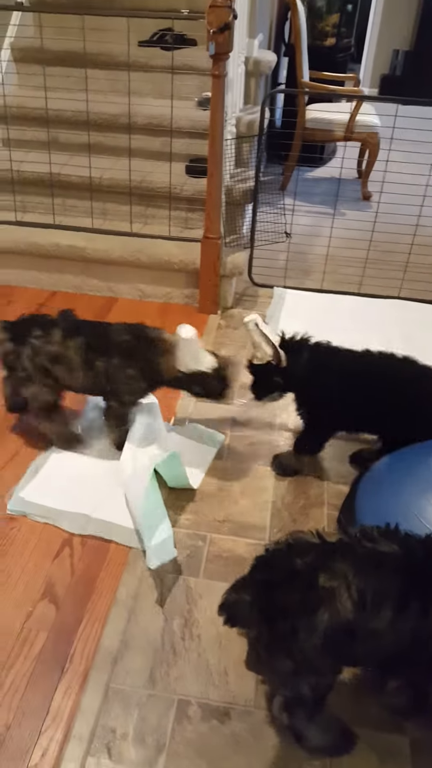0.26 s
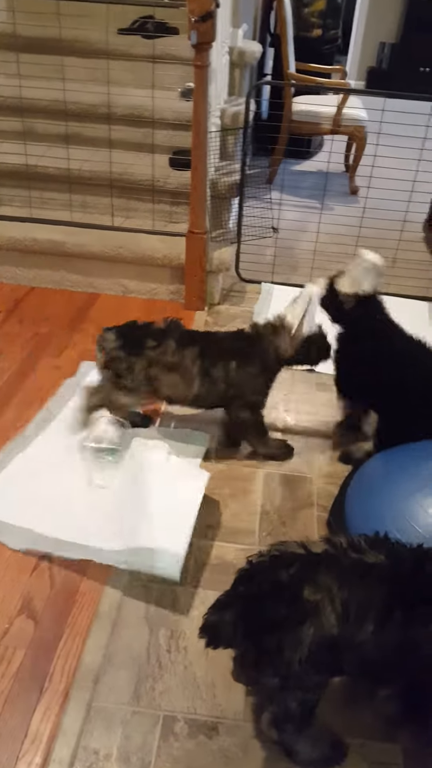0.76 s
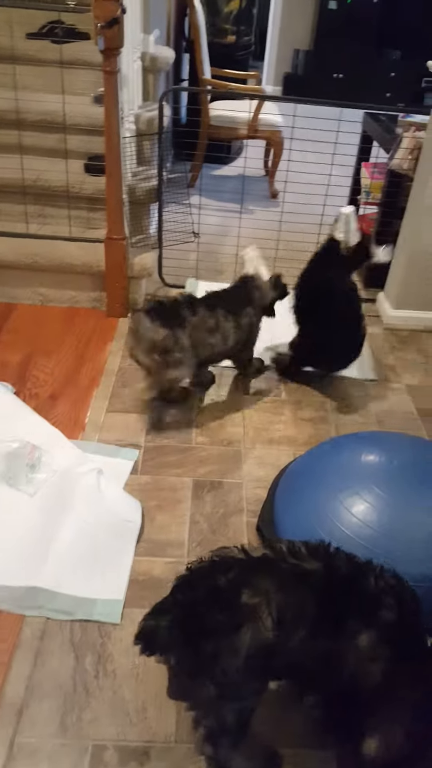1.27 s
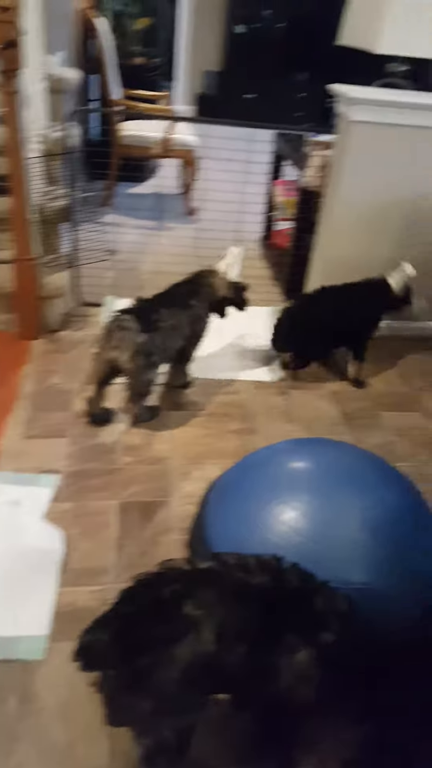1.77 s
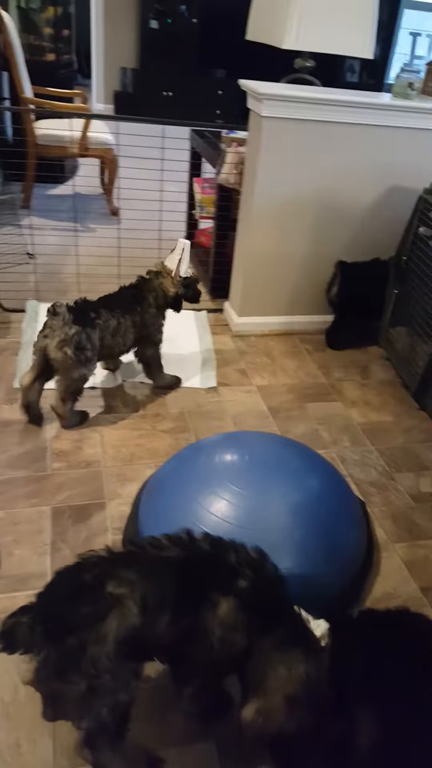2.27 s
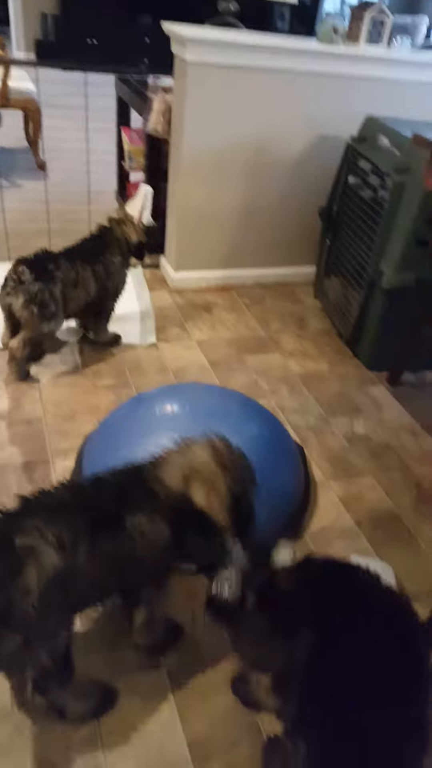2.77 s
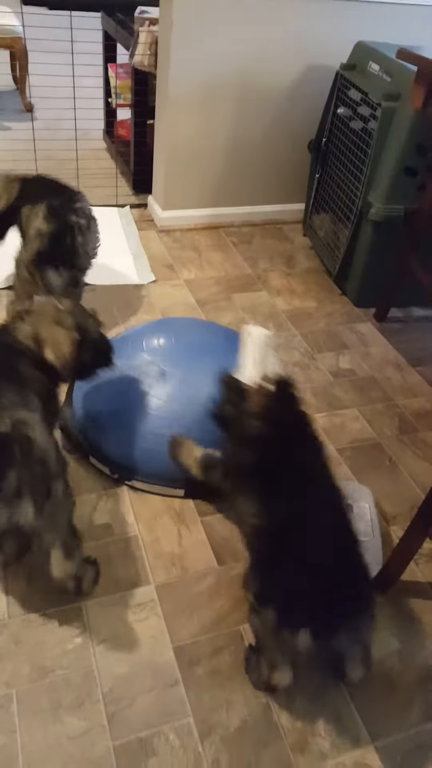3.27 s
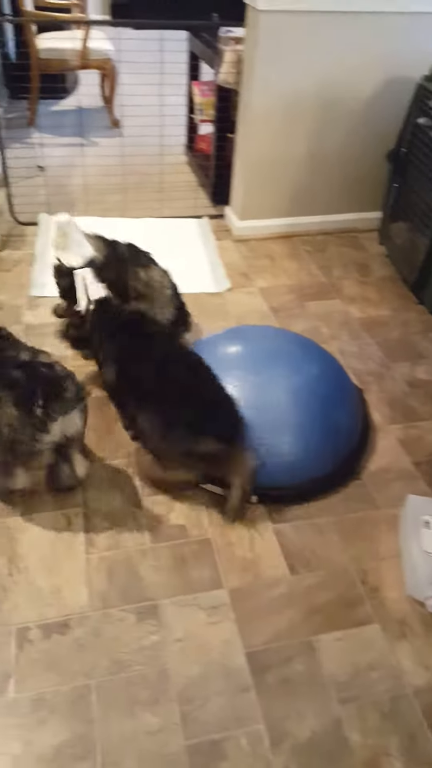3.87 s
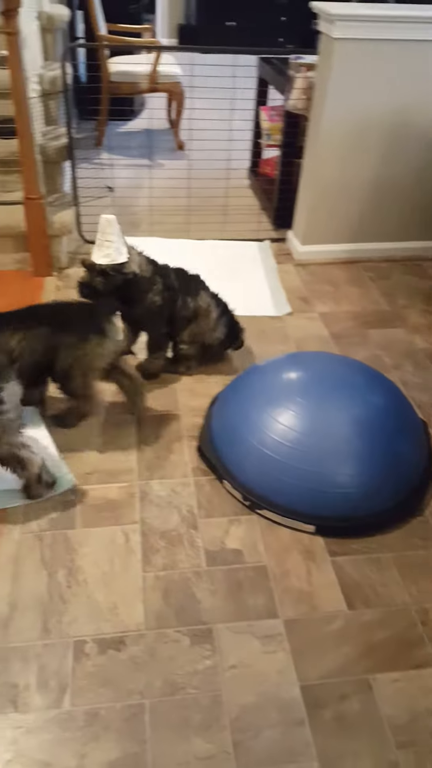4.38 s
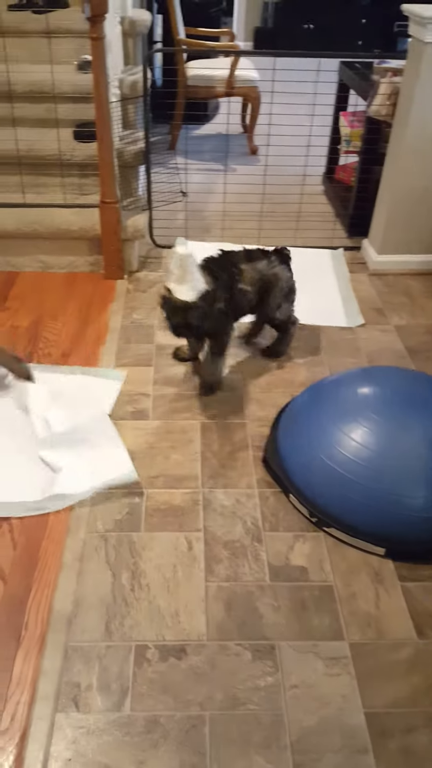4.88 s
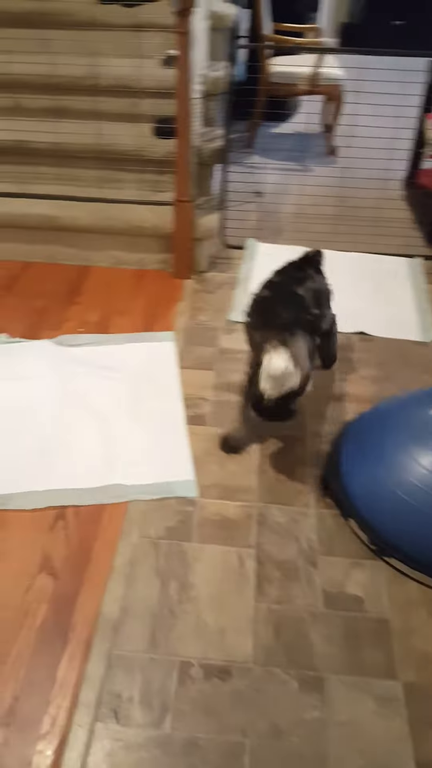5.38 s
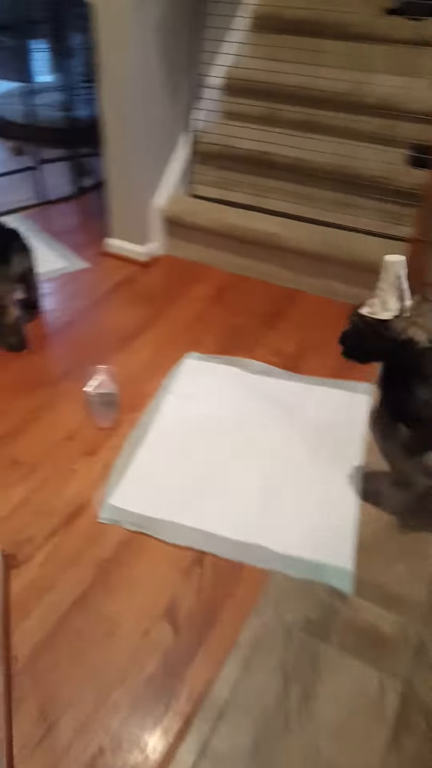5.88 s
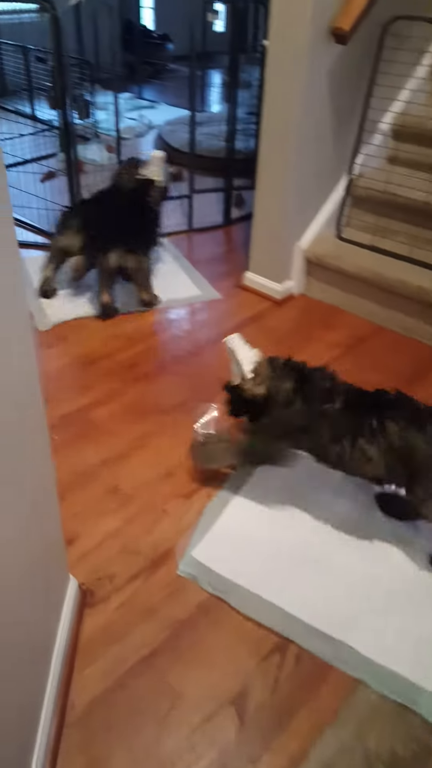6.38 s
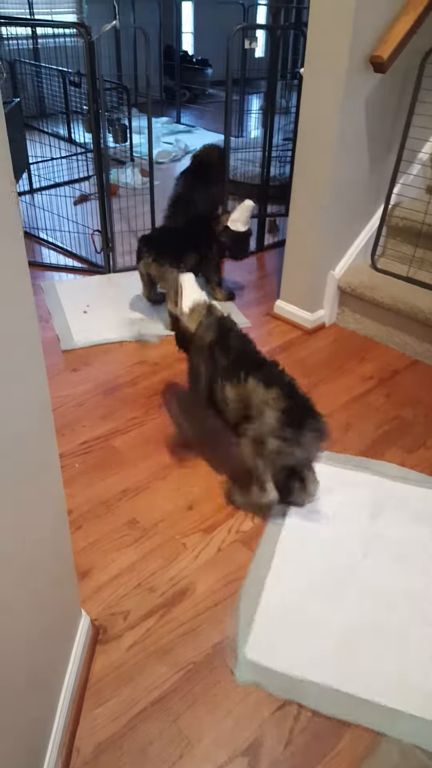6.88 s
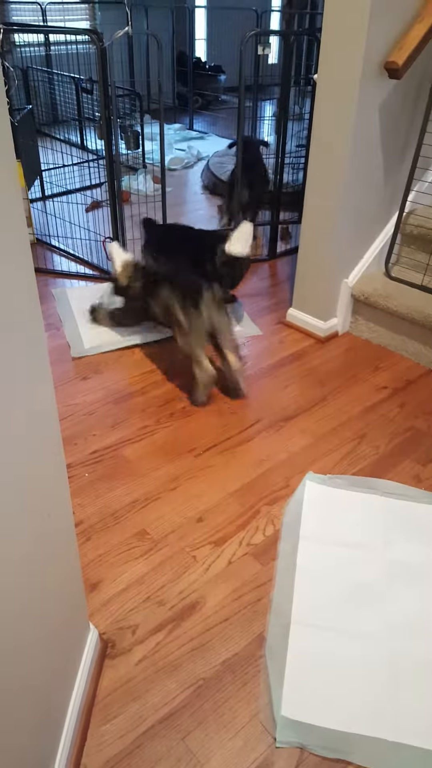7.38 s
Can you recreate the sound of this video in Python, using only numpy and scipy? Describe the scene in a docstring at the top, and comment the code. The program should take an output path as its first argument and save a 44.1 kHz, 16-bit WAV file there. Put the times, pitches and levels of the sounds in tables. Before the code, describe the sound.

An empty plastic bottle bounces hollowly across a hard floor while puppies' paws thump, claws click and paper pads swish.

```python
"""A kitchen with a wood and vinyl floor, where puppies romp with an empty plastic bottle.
The bottle bounces with hollow knocks and pings, claws and buckling plastic click, and paws thud
on the boards. Feet scuff and scrabble over floor and paper pads in bouts.
A fairly live room answers every blow, over a quiet room tone."""
import sys
import numpy as np
from scipy import signal
from scipy.fft import rfft, irfft, next_fast_len
from scipy.io import wavfile
from scipy.ndimage import uniform_filter1d

SR = 44100
rng = np.random.default_rng(int(sys.argv[2]) if len(sys.argv) > 2 else 0)


def dump_mix(stems):
    """Bounce the given channels to the path in sys.argv[1] as a 16-bit WAV at rate SR."""
    frames = np.atleast_2d(stems).T  # one column per channel
    limited = np.clip(frames, -1, 1)  # hard clip at full scale
    pcm = np.round(limited * 32767).astype(np.int16)
    wavfile.write(sys.argv[1], SR, pcm)


N = 336924
HIT_TIME = np.arange(SR // 10) / SR   # time inside one hit [s]

# bottle bounces: (time [s], level [dB], pitch [Hz], wall [dB], tick offset [dB], reverb send [dB])
KNOCK_HITS = [(0.133, -35.5, 440, -28.5, -13, 0.5), (0.214, -13, 950, -10.5, -18, -9),
              (0.237, -10.5, 654, -10.5, -17, -0.5), (0.321, -8.5, 563, -12.5, -21, 2),
              (0.515, -19.5, 510, -19.5, -16, 1.5), (0.823, -22, 520, -30, -13, 1),
              (0.93, -26.5, 444, -46, -13, 5.5), (0.966, -17.5, 428, -54, -7, 1),
              (1.254, -6.5, 598, -50, -13, -0.5), (1.278, -22, 617, -49, -13, 1),
              (1.31, -26, 643, -43, -13, 2), (1.371, -28, 614, -23.5, -11, -3.5),
              (1.794, -52, 940, -27.5, -13, 9.5), (1.808, -29.5, 560, -29, -5.5, 7.5),
              (2.094, -23, 587, -32.5, -10, -8), (2.676, -19, 850, -42, -13, -0.5),
              (2.7, -23.5, 540, -29, -10, 0), (2.985, -28, 720, -18, -31, -10),
              (4.581, -13.5, 520, -18, -31, 1.5), (4.726, -12.5, 620, -22.5, -15, -2),
              (4.778, -25, 467, -29.5, -7, 0), (4.924, -22, 656, -44, -13, 1),
              (4.951, -23.5, 520, -24.5, -11, 6.5), (5.064, -23, 680, -75, -9, 7),
              (5.2, -23, 610, -35, -15, 8.5), (5.3, -13, 635, -22, -6, -3),
              (5.329, -15.5, 647, -36, -8.5, -1.5), (5.403, -16.5, 583, -36, -13, -12),
              (5.445, -17.5, 615, -50, -13, 3), (5.646, -27, 630, -33, -7, 1),
              (5.703, -31.5, 550, -28, -16, 6), (6.455, -23, 500, -25, -26, 9),
              (6.462, -14.5, 560, -21, -2.5, 2.5), (6.488, -27, 720, -43, -14, -9),
              (6.504, -4.5, 623, -12.5, -12, -1), (6.718, -16.5, 664, -18.5, -9, 4.5),
              (6.735, -13.5, 630, -16, -15, -9), (6.853, -18, 690, -24.5, -9, 1),
              (7.325, -30, 644, -53, 7.5, 8.5), (7.4225, -22, 750, -26, -18, 9.5),
              (7.435, -11, 493, -20, -11.5, 3.5), (7.466, -16.5, 554, -16.5, -24, 1),
              (7.566, -21, 480, -39, -11, 4.5), (7.594, -9.5, 696, -25, -0.5, 1.5)]
# ringing notes of the bottle, and one short squeak of a skidding paw at 2.28 s: (time [s], level [dB], pitch
# [Hz], t60 [s])
PING_HITS = [(0.2374, -18, 1270, 0.033), (0.322, -18.5, 519, 0.13), (0.323, -9.5, 889, 0.045),
             (0.515, -21, 512, 0.072), (0.964, -17.5, 248, 0.085), (0.966, -22.5, 466, 0.15),
             (1.255, -14, 637, 0.13), (2.2832, -11.5, 4180, 0.02), (2.595, -32, 1220, .03),
             (2.677, -36, 980, .04), (2.7434, -28, 2050, .015), (2.7737, -20, 3150, 0.013),
             (2.9325, -25, 1190, 0.037), (2.9327, -19.5, 3750, 0.014), (2.933, -21, 1930, .025),
             (2.985, -33, 1030, 0.034), (2.9852, -28, 2010, .025), (3.168, -20, 1240, 0.016),
             (3.45, -17.5, 1280, .025), (3.4719, -13.5, 1246, 0.023), (3.5189, -16, 1310, 0.036),
             (3.5191, -13.5, 3680, 0.016), (4.58, -13.5, 259, 0.06), (4.581, -14, 560, 0.056),
             (4.5815, -21, 1400, 0.075), (4.727, -22, 830, 0.043), (4.9406, -15, 1130, 0.033),
             (5.1991, -9, 1265, 0.011), (5.2995, -19, 1020, 0.02), (5.301, -22, 609, 0.11),
             (5.33, -31, 910, .05), (5.405, -23.5, 870, 0.057), (5.446, -19.5, 742, 0.044),
             (5.4876, -19.5, 3200, 0.011), (6.505, -10, 866, 0.055), (6.511, -16.5, 526, .12),
             (6.6433, -14.5, 1370, 0.022), (6.644, -15.5, 944, 0.022), (6.719, -21, 636, 0.19),
             (6.736, -33, 785, 0.23), (6.854, -30, 780, 0.17), (7.445, -24, 620, 0.18),
             (7.468, -30, 600, 0.091), (7.466, -23.5, 1270, 0.17), (7.594, -11.5, 635, 0.11)]
# claws and buckling plastic: (time [s], level [dB], ring [Hz], body [dB], edge [dB], reverb send [dB])
CLICK_HITS = [(0.2432, -20, 2550, -17, -18.5, 6.5), (0.3198, -23, 3000, -34, -33, -5),
              (0.4716, -40, 2800, -21, -36, 7), (0.512, -16, 3600, -28, -48, -17),
              (0.828, -37, 4760, -38, -44, 18), (0.9242, -25, 3300, -53, -21.5, 4),
              (0.963, -46, 4500, -46, -31.5, 16), (1.113, -36, 4300, -33.5, -42, 9.5),
              (1.1697, -33, 3870, -42, -36.5, 12.5), (1.302, -29, 3900, -54, -27, 2),
              (1.466, -30, 4750, -26, -17, -1), (1.4764, -33, 3530, -25, -51, 9.5),
              (1.51, -27, 4710, -24, -58, 7), (1.533, -41, 4300, -37, -50, -9),
              (1.579, -27, 4600, -44, -48, -4), (1.6002, -27, 3500, -38, -15.5, 4.5),
              (1.6065, -36, 4500, -38, -21, 1), (1.671, -27, 3900, -48, -83, 9),
              (1.8242, -25, 3100, -26.5, -22.5, 6), (1.9624, -17.5, 4800, -22, -22, 2.5),
              (1.9005, -23, 4700, -31, -59, -17), (2.2486, -20.5, 4330, -47, -58, -7),
              (2.2835, -10.5, 4160, -26, -41, 5), (2.4296, -23, 2600, -24.5, -15.5, 5),
              (2.4675, -26, 2800, -22, -29, -6), (2.5686, -27.5, 4540, -31, -60, 7.5),
              (2.597, -19.5, 3950, -22.5, -46, 5), (2.6352, -22, 4930, -25, -23, -2),
              (2.6685, -17.5, 4600, -18, -14.5, 4), (2.6775, -27, 4200, -20, -30, 5),
              (2.7025, -31, 4000, -25, -33, 12), (2.7432, -12.5, 2700, -15.5, -10, 1.5),
              (2.7732, -22, 3150, -18.5, -4, 1.5), (2.7815, -27, 4070, -28.5, -19, 15.5),
              (2.9323, -16, 2740, -23, -35, 4.5), (2.943, -21, 3300, -17, -11, 0.5),
              (2.9846, -11.5, 2660, -15, -30, 4.5), (2.9945, -25, 2600, -16, -30, -3),
              (3.0385, -20, 3100, -27, -48, -3), (3.078, -26, 3200, -34, -35, 2),
              (3.108, -25, 2800, -26, -47, -2), (3.1677, -28.5, 2550, -31, -43, 9),
              (3.427, -28, 4200, -43, -33, 6), (3.4493, -17, 3270, -27, -45, 4.5),
              (3.4717, -18, 3240, -16, -14.5, 5), (3.482, -29, 3400, -27, -20, -6),
              (3.5189, -14, 3800, -15, -19, 2), (3.829, -37, 2720, -31, -46, 10.5),
              (3.9161, -25, 3600, -24.5, -42, 9.5), (3.947, -32, 3800, -42, -32, 9),
              (3.982, -17, 2660, -21.5, -22.5, 6.5), (3.9915, -29, 2800, -41, -33, -1),
              (4.1886, -30, 3500, -50, -36.5, 7.5), (4.9084, -28, 3500, -21.5, -28, 5.5),
              (4.9403, -32, 3300, -18.5, -27, 10), (4.9595, -40, 3000, -48, -35, 9),
              (5.2003, -13.5, 3300, -17, -17, 5), (5.2072, -20, 2850, -23, -42, -8),
              (5.3704, -17.5, 3500, -23, -24, -4), (5.4131, -18.5, 3400, -23, -26, 4),
              (5.454, -16.5, 2940, -29, -45, 2), (5.4875, -22, 3430, -19, -40, -10),
              (5.509, -30, 2800, -26, -52, 2), (5.527, -37, 2900, -27.5, -52, -6),
              (5.7595, -41, 2600, -30, -58, 0), (5.778, -37, 2600, -42, -45, 6),
              (6.1387, -44, 3800, -39.5, -46.5, 15), (6.4605, -29, 3800, -19, -24, 13),
              (6.5039, -14.5, 4330, -33, -28, -1), (6.512, -36, 4200, -28, -25, 1),
              (6.5185, -26, 4400, -27, -30, 4), (6.6433, -18.5, 2590, -14, -19, 4),
              (6.7448, -18.5, 2880, -21, -21, 4)]
# resonances of the bottle's thin wall: (frequency [Hz], width [Hz], boost [dB])
WALL_MODES = [(1270, 490, -2.5), (1820, 1540, -11), (2110, 660, 9.5), (3500, 880, 4), (8130, 2700, 9),
              (13500, 1300, 4)]
# the clicks move with the puppies: (time [s], left channel lag [ms])
CLICK_LAG = [(0.0, 0.063), (1.25, -0.1), (1.45, 0.22), (2.42, 0.24), (2.78, 0.17), (2.95, 0.08),
             (3.5, 0.02), (5.4, 0.043), (6.55, -0.053), (7.6, -0.11)]
# paw landings: (time [s], level [dB], floor pitch [Hz], slap offset [dB])
PAW_HITS = [(0.135, -35, 75, -18), (0.236, -27, 206, -20), (0.325, -19, 222, -20), (0.47, -16, 180, -23),
            (0.62, -27, 170, -17), (0.69, -28.5, 148, -17), (0.755, -42, 160, -20), (0.82, -23, 198, -19),
            (0.964, -15.5, 248, 0), (1.066, -18, 139, -15), (1.31, -25, 157, -28), (1.385, -53, 150, -20),
            (1.533, -16.5, 134, -11), (1.552, -18.5, 179, -19), (1.573, -20, 109, -4),
            (1.847, -15.5, 154, -8), (1.965, -29.5, 171, -7), (2.068, -20.5, 124, -7.5),
            (2.246, -19, 184, -12), (2.295, -20.5, 158, -18), (2.43, -41, 141, -19), (2.5, -41, 150, -22),
            (2.645, -24, 139, -3.5), (2.858, -34.5, 203, -24), (2.985, -23.5, 206, -2),
            (3.032, -23, 146, -9), (3.072, -27.5, 173, -23), (3.105, -25.5, 124, -11),
            (3.18, -35, 121, -18), (3.238, -23, 133, -14), (3.345, -30.5, 129, -26),
            (3.39, -26.5, 131, -24), (3.42, -22, 167, -12), (3.485, -32, 173, -24), (3.555, -26, 145, -19),
            (3.582, -20.5, 121, -21), (3.694, -25, 190, -19), (3.722, -25, 142, -26),
            (3.797, -32, 138, -28), (3.832, -16.5, 112, -19), (3.9, -24, 121, -21),
            (3.917, -16.5, 171, -5.5), (3.935, -18.5, 167, -28), (3.952, -15, 135, -23),
            (4.02, -27.5, 220, -22), (4.05, -21, 118, -32), (4.2, -31, 160, -26), (4.3, -31, 108, -30),
            (4.425, -31, 111, -11), (4.579, -15.5, 282, -8), (4.655, -24, 252, -15), (4.724, -23, 273, -28),
            (4.775, -26, 274, -20), (4.83, -27, 237, -3), (4.91, -38, 150, -23), (4.945, -30, 150, -15),
            (5.02, -20, 103, -16), (5.06, -19.5, 233, -5), (5.14, -26.5, 109, -22), (5.22, -29, 119, -27),
            (5.39, -28, 202, -13), (5.467, -15, 146, -22), (5.495, -22, 187, -16), (5.675, -42, 130, -22),
            (5.759, -27.5, 150, -12), (6.083, -23, 156, -24), (6.181, -24.5, 104, -12),
            (6.25, -23.5, 238, -11), (6.3, -33, 122, -24), (6.49, -18.5, 109, -25), (6.56, -26, 115, -22),
            (6.645, -27, 113, -12), (6.723, -22.5, 172, -27), (6.835, -17.5, 223, -12),
            (6.92, -18, 122, -12), (7.044, -9, 154, -21), (7.125, -27, 121, -21), (7.17, -24.5, 128, -22),
            (7.219, -21, 186, -4.5), (7.275, -23.5, 173, -23), (7.432, -8, 300, -17),
            (7.479, -17, 140, -12), (7.599, -12, 139, -13)]
# how far the joists give where the puppies are: (time [s], level against the boards [dB])
JOIST_GIVE = [(0.0, -29), (1.5, -11.5), (2.7, -25), (4.0, -10), (4.9, -47), (7.64, -34)]
# feet sliding on floor and pads: (time [s], level [dB], pitch [Hz], width [octaves])
FOOT_SLIDES = [(0.004, -26, 1890, 0.85), (0.13, -25, 2110, 0.64), (0.2135, -10, 2200, 0.89),
               (0.5667, -11.5, 1820, 1), (0.63, -19, 1270, 1.9), (1.21, -28, 1230, 0.47),
               (1.384, -22, 1220, 2), (1.55, -32, 1490, 2.7), (2.153, -22.5, 3840, 1.1),
               (2.2, -20.5, 1720, 1.9), (3.009, -20, 1380, 1.8), (3.12, -14, 1010, 1),
               (3.201, -24, 1900, 1.5), (3.31, -18, 1100, 1.74), (4.093, -20.5, 2450, 1.6),
               (4.385, -28, 1380, 0.57), (4.459, -22.5, 1310, 2.1), (4.461, -27.5, 5170, 0.6),
               (4.843, -14.5, 3630, 1.26), (5.589, -18.5, 1600, 3.9), (5.757, -31, 1470, 2.6),
               (6.315, -27.5, 1600, 1.2), (7.464, -12, 1510, 1.55), (7.562, -13, 1820, 1.9)]
# a paper pad is dragged or trodden on: (time [s], swish [dB], fine hiss [dB])
PAD_DRAGS = [(0.13, -49, -52.5), (0.41, -44, -50), (0.57, -35, -44), (1.09, -48, -53), (1.27, -60, -53),
             (1.56, -62, -58), (2.3, -40.5, -50), (3.075, -35.5, -48), (3.5, -37, -58), (4.09, -45.5, -53),
             (4.39, -49.5, -51), (4.46, -63, -68), (4.61, -60, -56), (4.75, -42.5, -51), (5.15, -44, -52),
             (5.985, -59, -58.5), (6.17, -54, -55.5), (6.235, -47, -57), (6.29, -46, -51.5),
             (6.75, -50, -48), (6.931, -47, -44), (7.02, -47, -52), (7.3, -59, -56), (7.545, -48, -62)]
# fader ride of the soft steps, in bouts: (time [s], level [dB])
STEP_FADER = [(0.0, -41), (0.2, -63), (0.32, -38.5), (0.78, -47.5), (1.3, -45), (1.75, -54), (2.05, -43),
              (2.9, -49.5), (3.05, -43), (3.95, -51), (4.53, -48.5), (4.66, -39), (5.55, -41),
              (5.95, -58.5), (6.22, -39), (6.42, -57), (6.62, -38), (7.39, -36), (7.64, -41)]
# fader rides between the hits: (time [s], scrabbling [dB], paper rustle [dB])
BUSTLE_FADERS = [(0.0, -30, -39), (0.12, -52, -56), (0.38, -34, -42), (0.62, -31, -72), (0.78, -42, -41.5),
                 (1.2, -39, -48.5), (1.62, -40, -39.5), (1.92, -40, -50), (2.2, -41, -40.5),
                 (2.4, -42.5, -45), (2.53, -46, -50), (2.8, -38.5, -46), (3.3, -44.5, -45.5),
                 (3.5, -32.5, -54), (3.6, -46.5, -46), (3.78, -51, -47.5), (4.0, -37.5, -72),
                 (4.29, -53.5, -55.5), (4.55, -35, -46.5), (4.9, -39, -45), (5.1, -59, -48.5),
                 (5.45, -35, -44.5), (5.92, -50, -75), (6.42, -55, -58), (6.75, -33, -44), (7.05, -39, -44),
                 (7.39, -42.5, -52.5), (7.5, -36.5, -50), (7.64, -21, -34)]
# tone of the soft steps: (frequency [Hz], level [dB])
STEP_EQ = [(30, -47), (60, -13), (95, 5.5), (150, -6), (260, -3), (400, -12.5), (800, -69)]
# tone of scrabbling claws: (frequency [Hz], level [dB])
SCRABBLE_EQ = [(250, -6.5), (450, 2.5), (700, 3.5), (1200, -4.5), (2000, -14.5), (3600, -13.5),
               (6000, -18.5), (10000, -27)]
# tone of crumpling paper: (frequency [Hz], level [dB])
RUSTLE_EQ = [(2500, -1.5), (4500, -6), (6300, -8.5), (8200, -11.5), (10500, -16), (14500, -12),
             (17000, -64)]
# tone of sliding paper: (frequency [Hz], level [dB])
SWISH_EQ = [(2500, 3.5), (4500, 0), (6300, -4.5), (8200, -12), (10500, -24), (14800, -38), (17000, -45)]
# fine hiss on top of a sliding pad: (frequency [Hz], level [dB])
HISS_EQ = [(4000, -16), (8300, 3), (10500, -3), (14500, -5), (17000, -30)]
# the kitchen's steady background: (frequency [Hz], level [dB])
ROOM_TONE_EQ = [(25, -19), (60, 11.5), (140, 31), (300, -6), (650, 8.5), (1200, 5), (2500, 0), (5500, -6),
                (10000, -13.5), (16000, -16)]
# reverb decay by band: (frequency [Hz], t60 [s])
REVERB_DECAY = [(90, 0.46), (260, 0.42), (700, 0.55), (2000, 0.65), (5000, 0.31), (9000, 0.29),
                (15000, 0.024)]
# floor and room resonances and the dips between them: (frequency [Hz], width [Hz], boost [dB])
REVERB_MODES = [(146, 12, 4), (244, 69, 8), (414, 31, -3.5), (507, 100, 4), (635, 81, 3), (820, 61, 3),
                (1600, 300, -1.5)]
# stereo lean by pitch: (frequency [Hz], left minus right [dB])
STEREO_LEAN = [(100, 1.3), (250, 1.8), (500, 3), (1000, 1.5), (2000, 0.5), (4000, -2), (8000, -0.5),
               (13000, 4)]


def bottle_knocks(spots, hollow_db=-1.0, wall_db=-5.0):
    """The bottle bounces: its air and shell ring hollow, the floor booms, its thin wall ticks."""
    out = np.zeros((2, N))
    for k, (s, db, hz, wall, tick, send_db) in enumerate(KNOCK_HITS):
        touch = resonate(contact(smear_s=0.002105), WALL_MODES)
        boom_db = -15.5 - 21 * np.log2(hz / 560)   # lower knocks shake the floor more
        shell = at_level(band(touch, hz=1050, octaves=0.84), wall + wall_db)
        top = at_level(band(touch, hz=3600, octaves=0.81), wall + tick)
        hollow = at_peak(band(HIT_TIME == 0, hz, octaves=0.83, order=3), db + hollow_db)
        boom = at_level(band(HIT_TIME == 0, hz=257.6, octaves=0.99, order=3), db + boom_db)
        add(out, s, in_room(shell + top + hollow + boom, spots[k % len(spots)], send_db, pan_db=-1.0))
    return out


def bottle_pings(spots, trim_db=-2.0, rise_cycles=1.26):
    """A knock or a popping dent rings one note of the bottle; where it is struck decides which. A skidding paw
    squeaks once in the same way."""
    out, t = np.zeros((2, N)), np.arange(SR // 4) / SR
    for k, (s, db, hz, t60) in enumerate(PING_HITS):
        attack = 1 - np.exp(-hz * t / rise_cycles)
        ring = np.sin(2 * np.pi * hz * t) * attack * np.exp(-np.log(1000) * t / t60)
        add(out, s, in_room(at_peak(ring, db + trim_db), spots[k % len(spots)], wet_db=-9.5))
    return out


def clicks(spots, body_db=-5.5, edge_db=-10.0, wet_db=-5.5):
    """A claw tip or a buckling wall snaps: a broad crack, a lower body note and a bright edge."""
    out = np.zeros((2, N))
    for k, (s, db, hz, body, edge, send_db) in enumerate(CLICK_HITS):
        snap = resonate(contact(smear_s=0.0024), WALL_MODES)
        octaves = 0.96 * (3300 / hz) ** 1.57   # higher clicks ring narrower
        click = at_peak(band(snap, hz, octaves), db)
        # neighbouring modes swing in opposition
        click -= at_level(band(snap, hz=1273, octaves=0.86), body + body_db)
        click -= at_level(band(snap, hz=7500, octaves=2.0), edge + edge_db)
        lag_ms = np.interp(s, *np.transpose(CLICK_LAG))
        add(out, s, from_side(dented(click), lag_ms, pan_db=-2.0))
        reverb = signal.fftconvolve(click, spots[k % len(spots)], axes=1)
        add(out, s, from_db(wet_db + send_db) * reverb)
    return out


def dented(x, count=9, low_hz=1500, high_hz=14000):
    """At every snap the crushed wall beams a new set of notes at the listener, at the same energy."""
    place, depth = rng.random((2, count))
    hz = low_hz * (high_hz / low_hz) ** ((np.arange(count) + place) / count)
    width_hz = 300 * np.sqrt(hz / low_hz)
    peak_or_dip = (-1) ** (np.arange(count) + rng.integers(2))
    boost_db = 7.5 * (.5 + depth) * peak_or_dip
    return x.std() * rms_one(resonate(x, zip(hz, width_hz, boost_db)))


def contact(smear_s, own_share=0.17):
    """One sharp touch; bending waves smear it briefly, a little differently toward each channel."""
    hz = np.fft.rfftfreq(len(HIT_TIME), 1 / SR)
    shared, *sides = rng.random((3, 64)) ** 2   # most of the energy leaves at once
    grid_hz = np.linspace(0, SR / 2, len(shared))
    delay_s = [np.interp(hz, grid_hz, smear_s * (shared + own_share * own)) for own in sides]
    phase = 2 * np.pi * np.cumsum(delay_s, axis=1) * hz[1]
    return irfft(np.exp(-1j * phase), len(HIT_TIME))


def paw_thuds(spots, press_s=0.0055, trim_db=-1.5, slap_db=1.0):
    """A soft paw sets the boards swinging over the slower joists; a firm landing also slaps."""
    out = np.zeros((2, N))
    press = HIT_TIME * np.exp(-2 * np.pi * HIT_TIME / press_s)
    for k, (s, db, hz, slap) in enumerate(PAW_HITS):
        boards = at_peak(band(press, hz, octaves=0.65), 0)
        smack = at_level(band(press, hz=510, octaves=1.4, order=3), slap + slap_db)
        joists = at_peak(band(press, hz=75, octaves=0.38), np.interp(s, *np.transpose(JOIST_GIVE)))
        thud = in_room(boards + smack + joists, spots[k % len(spots)], wet_db=-2.5)
        add(out, s, at_peak(thud, db + trim_db))
    return out


def foot_scuffs(spots, trim_db=-10.0, attack_s=0.00083, decay_s=0.027):
    """A foot catches and slides to rest in a short gritty hiss."""
    out, t = np.zeros((2, N)), np.arange(SR // 4) / SR
    speed = (1 - np.exp(-t / attack_s)) * np.exp(-t / decay_s)
    for k, (s, db, hz, octaves) in enumerate(FOOT_SLIDES):
        slide = band(rng.laplace(size=len(t)) * speed, hz, octaves)
        add(out, s, in_room(at_peak(slide, db + trim_db), spots[k % len(spots)], wet_db=0.0))
    return out


def bustle(spots, steps_db=0.5, scrabble_db=-3.0, skitter_db=-27, crackle_db=-37.5):
    """Soft steps, scrabbling claws and crumpling paper lay a grainy bed between the hits."""
    step_gain, = faders(STEP_FADER)
    scrabble_gain, rustle_gain = faders(BUSTLE_FADERS)
    skitter = from_db(skitter_db) * swells(KNOCK_HITS, rise_s=0.0076)   # the bottle skids on
    crackle = from_db(crackle_db) * swells(CLICK_HITS, rise_s=0.033)   # a fine tail on each click
    paws = grains(per_s=200, spread_db=2.0, eq=STEP_EQ, echoes=spots[0], wet_db=8.0)
    claws = grains(per_s=220, spread_db=3.5, eq=SCRABBLE_EQ, echoes=spots[1], wet_db=3.0)
    crumple = grains(per_s=600, spread_db=3.5, eq=RUSTLE_EQ, echoes=spots[2], wet_db=5.0)
    steps = from_db(steps_db) * step_gain * paws
    scrabble = (from_db(scrabble_db) * scrabble_gain + skitter) * claws
    return steps + scrabble + (rustle_gain + crackle) * crumple


def grains(per_s, spread_db, eq, echoes, wet_db):
    """Countless small touches of uneven size, heard in the room; rms 1."""
    sizes = from_db(spread_db * np.minimum(rng.exponential(1, N), 3)) * rng.choice([-1, 1], N)
    touches = sizes * (rng.random(N) < per_s / SR)
    return coloured(in_room(touches, echoes, wet_db)[:, :N], eq)


def paper_swishes(swish_db=-0.5, rise_s=0.028):
    """A paper pad slides over the floor: a gritty swish with fine hiss on top."""
    swish_gain = from_db(swish_db) * swells(PAD_DRAGS, rise_s)
    hiss_gain = swells([(s, db) for s, _, db in PAD_DRAGS], rise_s)
    swish = coloured(diffuse(N) + rng.laplace(size=N), SWISH_EQ)
    return swish_gain * swish + hiss_gain * coloured(diffuse(N), HISS_EQ)


def room_echoes(length_s=0.7, early_s=0.0086, onset_s=0.00029, lumpy_db=4.0):
    """The room's answer from one spot: lumpy early reflections, then a tail that dies band by band."""
    t = np.arange(int(length_s * SR)) / SR
    spectrum, hz = rfft(diffuse(len(t))), np.fft.rfftfreq(len(t), 1 / SR)
    centres, tail = np.array(REVERB_DECAY)[:, 0], 0
    for share, (_, t60) in zip(np.eye(len(centres)), REVERB_DECAY):
        part = irfft(spectrum * at_hz(np.c_[centres, share], hz), len(t))
        tail = tail + part * np.exp(-np.log(1000) * t / t60)
    lumps = from_db(lumpy_db * rms_one(uniform_filter1d(rng.standard_normal(len(t)), size=30)))
    early = 1 + lumps * np.exp(-t / early_s)
    fade_in = 1 - np.exp(-(t / onset_s) ** 2)
    return resonate(rms_one(tail * early * fade_in) / np.sqrt(len(t)), REVERB_MODES)


def room_tone(level_db=-53.5):
    """A quiet, bass-heavy wash from all around."""
    return from_db(level_db) * coloured(diffuse(N), ROOM_TONE_EQ)


def in_room(sound, echoes, wet_db, pan_db=0.0):
    """A hit arrives directly and by way of the room; positive pan leans the direct sound left."""
    path = from_db(wet_db) * echoes
    path[:, 0] += from_db([pan_db / 2, -pan_db / 2])
    return signal.fftconvolve(np.atleast_2d(sound), path, axes=1)


def from_side(sound, lag_ms, pan_db):
    """Place the direct sound by a time and a level offset between the channels."""
    lag = round(lag_ms * SR / 1000)
    padding = max(lag, 0), max(-lag, 0)
    left, right = np.pad(sound[0], padding), np.pad(sound[1], padding[::-1])
    return np.array([left, right]) * from_db([[pan_db / 2], [-pan_db / 2]])


def diffuse(size, wide_above_hz=720):
    """Noise from all around: mono in the bass, wide in the treble."""
    mid, side = rng.standard_normal((2, size))
    side = signal.sosfilt(signal.butter(2, wide_above_hz, "high", fs=SR, output="sos"), side)
    return np.array([mid + side, mid - side]) / np.sqrt(2)


def band(x, hz, octaves, order=2):
    """A broad, quickly dying resonance."""
    high = min(hz * 2 ** (octaves / 2), .45 * SR)
    low = min(hz / 2 ** (octaves / 2), .9 * high)
    return signal.sosfilt(signal.butter(order, [low, high], "band", fs=SR, output="sos"), x + 1e-18)


def resonate(x, modes):
    """Boost or cut each band in turn."""
    for hz, width_hz, boost_db in modes:
        x = x + (from_db(boost_db) - 1) * signal.lfilter(*signal.iirpeak(hz, hz / width_hz, SR), x)
    return x


def coloured(x, eq):
    """Shape a steady sound with an EQ curve; rms 1."""
    size = next_fast_len(N)
    gain = from_db(at_hz(eq, np.fft.rfftfreq(size, 1 / SR)))
    return rms_one(irfft(rfft(x, size) * gain, size)[..., :N])


def swells(events, rise_s):
    """An envelope that rises to each event's level and dies away more slowly."""
    out, age = np.zeros((1, N)), np.arange(SR)[None] / SR / rise_s
    shape = age * np.exp(1 - age)
    for s, db, *_ in events:
        add(out, s, from_db(db) * shape)
    return out


def faders(curve):
    """Each dB column of a fader ride as a gain per sample."""
    s, *columns = np.transpose(curve)
    return [from_db(np.interp(np.arange(N) / SR, s, db)) for db in columns]


def at_hz(points, hz):
    """Read a table along log frequency."""
    known, value = np.transpose(points)
    return np.interp(np.log(np.maximum(hz, 1)), np.log(known), value)


def at_peak(x, db):
    """Scale so that the highest sample is at db."""
    return from_db(db) * x / np.abs(x).max()


def at_level(x, db):
    """Scale so that the loudest 3 ms are at db."""
    return from_db(db) * x / np.sqrt(uniform_filter1d(x ** 2, size=132).max())


def rms_one(x):
    """Scale to unit rms."""
    return x / np.sqrt(np.mean(x ** 2) + 1e-20)


def from_db(db):
    """Decibels to gain."""
    return 10 ** (np.asarray(db) / 20)


def add(out, s, sound):
    """Mix a sound in at time s."""
    start = max(int(s * SR), 0)
    out[:, start:start + sound.shape[1]] += sound[:, :N - start]


def scene():
    """The full mix; the puppies move about, so the hits cycle through nine spots in the room."""
    spots = [room_echoes() for _ in range(9)]
    air = room_tone()
    bottle = bottle_knocks(spots) + clicks(spots) + bottle_pings(spots)
    return bottle + paw_thuds(spots) + foot_scuffs(spots) + bustle(spots) + paper_swishes() + air


def record(dry, cutoff_hz=16000):
    """Colour each channel a little differently, clip at full scale and cut the extreme top."""
    size = next_fast_len(N)
    lean_db = at_hz(STEREO_LEAN, np.fft.rfftfreq(size, 1 / SR))
    leaning = irfft(rfft(dry, size) * from_db([lean_db / 2, -lean_db / 2]), size)[:, :N]
    high_cut = signal.ellip(10, .2, 80, cutoff_hz, fs=SR, output="sos")
    return signal.sosfilt(high_cut, np.clip(leaning, -1, 1))


dry = scene()
out = record(dry)
dump_mix(out)
```